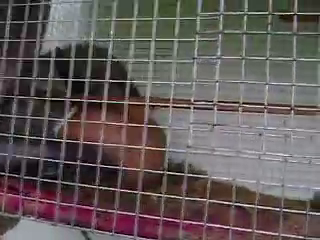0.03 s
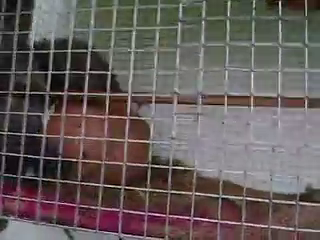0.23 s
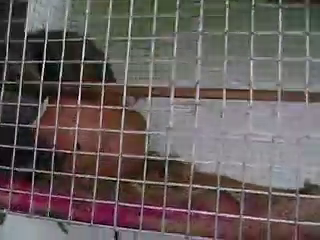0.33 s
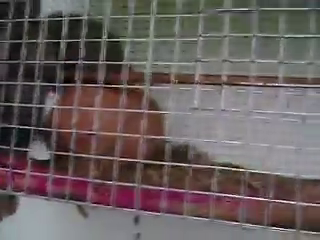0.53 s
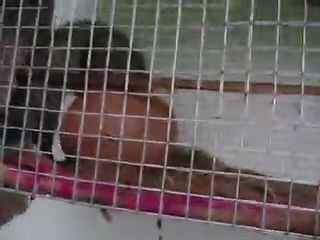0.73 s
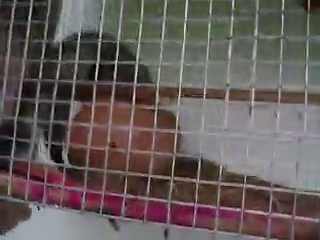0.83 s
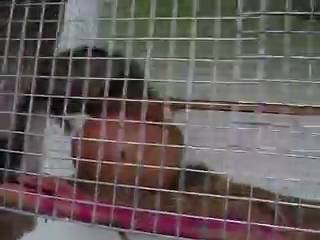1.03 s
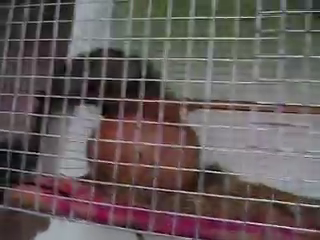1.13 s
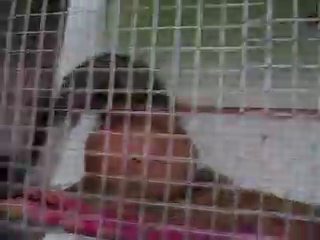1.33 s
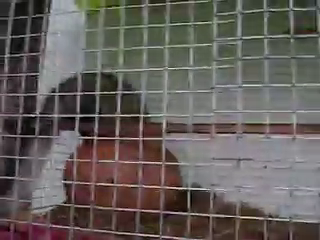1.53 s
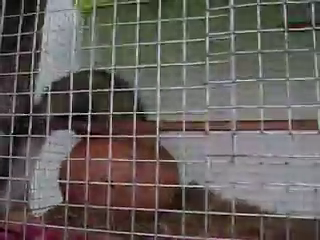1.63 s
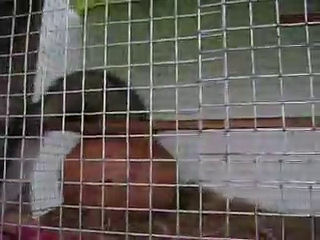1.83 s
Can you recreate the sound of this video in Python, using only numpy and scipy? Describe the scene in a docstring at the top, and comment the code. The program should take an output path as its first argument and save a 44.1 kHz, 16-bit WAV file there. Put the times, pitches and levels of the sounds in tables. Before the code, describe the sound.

A small caged animal squeaks hoarsely, close up. Low room noise, hiss and a thin wavering high tone open. At 0.26-0.44 s a loud raspy whistle rises briefly then falls steeply, with scuffling and soft thumps in bedding. Weaker falling chirps come at 0.7 and 1.06-1.2 s, with small ticks. A sharp wire snap at 1.48 s precedes two clearer squeaks until 1.63 s, then quiet noise.

```python
"""Hoarse, falling whistles of a small caged animal, close to the camera, over scuffling in its bedding.
The whistles are gliding sines broken into breathy pulses; grains, thumps and ticks make the bedding.
A wire snaps once as a burst of short modes. Thin tones waver in low room noise and treble hiss.
The camera is narrow in band, adds hiss that follows the level, and clips hard."""
import sys
import numpy as np
from scipy import signal
from scipy.fft import rfft, irfft, next_fast_len
from scipy.io import wavfile
from scipy.ndimage import uniform_filter1d, map_coordinates

SR = 44100
rng = np.random.default_rng(int(sys.argv[2]) if len(sys.argv) > 2 else 0)


def amp(db):
    return 10 ** (np.asarray(db, float) / 20)


def write(x):
    x = np.atleast_2d(x).T
    wavfile.write(sys.argv[1], SR, np.round(np.clip(x, -1, 1) * 32767).astype(np.int16))


N = 83790
T = np.arange(N) / SR

# Main whistles, one curve per call: t/s, pitch f/Hz, level/dB, hoarseness/0-1
OPENING_CALL = [(.261, 5000, -35.5, .7), (.265, 4880, -26, .7), (.268, 4220, -20.5, .8),
                (.271, 3920, -20, 0.77), (.285, 3860, -27, .9), (.298, 3770, -24.5, .9)]
LONG_CALL = [(.296, 2991, -30.5, .9), (.305, 3497, -21, .9), (.311, 3882, -18, 0.83), (.318, 3963, -21, .8),
             (.324, 4110, -16.5, .7), (0.337, 4090, -22, 0.92), (.35, 3900, -24, 0.68),
             (.359, 3577, -19, 0.64), (.372, 3330, -23.5, .9), (.39, 3017, -21.5, 0.91),
             (.397, 2580, -29, .7), (.405, 2284, -27.5, .6), (.415, 1986, -27.5, .6),
             (.421, 1977, -38.5, .7), (.428, 1990, -28, 0.61), (.438, 1920, -37.5, .7)]
SOFT_CALL = [(.658, 5460, -47, 0.73), (0.675, 5200, -42, .7), (.686, 4500, -45, .6),
             (.697, 3830, -31.5, .6), (.702, 3650, -36, 0.65), (.709, 3554, -27.5, 0.64),
             (.716, 3350, -28.5, 0.6), (.722, 3270, -42.5, 0.72)]
FAINT_CALL = [(1.064, 5020, -46, 0.62), (1.07, 4770, -37.5, .6), (1.08, 4275, -41, 0.62),
              (1.09, 3780, -41, 0.61), (1.098, 3420, -38, .8)]
PAIR_CALL = [(1.11, 5320, -43, 0.19), (1.122, 4950, -36.5, 0.25), (1.129, 4810, -25, 0.19),
             (1.139, 4624, -28.5, 0.42), (1.15, 4450, -28.5, 0.56), (1.157, 4400, -33, .6)]
PAIR_TAIL = [(1.156, 3945, -39, 0.837), (1.163, 3775, -25, 0.67), (1.168, 3667, -33, 0.69),
             (1.174, 3560, -23.5, 0.49), (1.18, 3415, -32.5, 0.86), (1.19, 3130, -33, 1),
             (1.197, 3080, -42, .8)]
FLAT_CALL = [(1.493, 4250, -45, .5), (1.5, 4064, -31, .5), (1.506, 3940, -22, .7), (1.511, 3893, -26, 0.64),
             (1.522, 3900, -29, .8), (1.535, 3870, -34.5, .8), (1.54, 3900, -44, .8)]
LAST_CALL = [(1.558, 5280, -39, .5), (1.564, 5135, -24.5, 0.54), (1.57, 4975, -28, .4),
             (1.577, 4834, -23, .2), (1.59, 4630, -22.5, .25), (1.601, 4450, -29, .5),
             (1.609, 4320, -33, .7), (1.622, 4250, -35.5, .8)]
# Short side notes beside the whistles: start t/s, length/s, first f/Hz, last f/Hz, level/dB
SIDE_NOTES = [(.272, .032, 4550, 4250, -28.5), (.274, 0.025, 5170, 4900, -32.5),
              (0.326, 0.018, 3400, 3200, -25.5), (.374, 0.015, 3880, 3600, -28),
              (0.333, 0.033, 4100, 4090, -33), (0.395, .035, 4400, 4200, -32),
              (0.404, .02, 3850, 3950, -30.5), (.426, .026, 3900, 3800, -23.5),
              (0.428, 0.018, 3550, 3520, -30.5), (.455, .018, 3700, 3520, -40),
              (0.698, 0.014, 4980, 4880, -46), (.704, 0.013, 950, 850, -38.5),
              (.788, 0.02, 1100, 1105, -35), (1.082, 0.022, 4350, 4230, -45),
              (1.12, 0.042, 2050, 2062, -41), (1.158, 0.017, 4700, 4540, -39),
              (1.506, .02, 4900, 4790, -42), (1.524, .022, 3700, 2720, -34),
              (1.553, 0.011, 2150, 1840, -29.5), (1.558, .016, 3950, 3250, -30.5),
              (1.56, .01, 5950, 5880, -35), (1.565, 0.072, 3050, 2950, -36.5),
              (1.584, .024, 3850, 3250, -28.5), (1.607, 0.0182, 3900, 3360, -32),
              (1.626, .02, 2650, 2290, -37), (1.628, 0.018, 5200, 5200, -38)]
# Colour of the breath noise under the voice: f/Hz, level/dB
RASP_COLOUR = [(900, -16.5), (2200, -5), (3500, 0), (5000, -3), (6500, -4.5), (8000, -61)]
# Loudness of the scuffling: t/s, level/dB
SCUFFLE_LEVEL = [(0.261, -50), (0.274, -34), (.3, -26), (.34, -26.5), (.37, -26.5), (.4, -29), (.44, -27.5),
                 (.455, -36.5), (.475, -52)]
# Colour of the scuffling: f/Hz, level/dB
SCUFFLE_TINT = [(40, -8.5), (300, -1.5), (1500, -2.5), (3000, -3.5), (6000, -8)]
# Soft thumps in the bedding: t/s, level/dB
BEDDING_THUMPS = [(.302, -26), (.3115, -19), (.3585, -18), (.334, -26), (.378, -26), (1.595, -30),
                  (1.772, -30)]
# Small ticks in the bedding: t/s, level at onset/dB
BEDDING_TICKS = [(.7244, -29), (0.7318, -27.5), (0.873, -34.5), (1.2096, -22.5)]
# Colour of the ticks: f/Hz, level/dB
TICK_TINT = [(500, -10.5), (1800, -2.5), (3800, 0), (5000, -7), (6500, -8.5)]
# Modes of the snapping wire: f/Hz, width/Hz, level relative to the snap/dB
WIRE_MODES = [(1117, 350, 2), (2276, 366, 4), (3250, 170, -6.5), (4457, 410, 3), (5026, 360, 4),
              (6000, 270, -10.5)]
# Two long wavering tones: t/s, f/Hz, level/dB
EARLY_TONE = [(0, 3110, -37.5), (.14, 3143, -47.5), (.225, 3116, -32), (.25, 3074, -36.5),
              (.3, 3054, -38.5), (.5, 3064, -37.5), (.65, 3083, -41), (.8, 3120, -41.5), (.9, 3114, -46),
              (1.09, 3130, -65)]
LATE_TONE = [(1.2, 3333, -52.5), (1.29, 3350, -43), (1.35, 3376, -45.5), (1.375, 3340, -50),
             (1.4, 3332, -49.5), (1.47, 3360, -51), (1.65, 3375, -47), (1.76, 3300, -59), (1.9, 3260, -59)]
# Faint steady-pitched tones: from t/s, to t/s, f/Hz, level/dB
FAINT_TONE_SPANS = [(0.013, 0.17, 2740, -47.5), (.03, 0.081, 2800, -44), (0.37, 0.74, 5000, -54),
                    (.93, 1.07, 450, -48.5), (.75, 1.08, 1300, -51.5)]
# Colour of the low room noise: f/Hz, density/dB per Hz
ROOM_COLOUR = [(20, -5.5), (60, -1), (300, -4.5), (800, -2.5), (1250, -5), (1700, -10), (2500, -12.5),
               (3300, -12.5), (4500, -19), (5500, -17), (6200, -32.5)]
# Low room noise before its fixed lift: t/s, level/dB
ROOM_CURVE = [(0.0, -35.5), (0.238, -38), (0.418, -40), (1.09, -39.5), (1.9, -39)]
# Colour of the treble hiss: f/Hz, level/dB
HISS_COLOUR = [(1400, -25.5), (1900, -2), (3300, -3), (4500, -1.5), (5800, -13.5), (6500, -13.5)]
# Loudness of the treble hiss: t/s, level/dB
HISS_LEVEL = [(0, -48), (.25, -41), (.5, -38.5), (.75, -42.5), (1, -54.5), (1.3, -45), (1.65, -51.5),
              (1.9, -76)]
# Colour of the hiss that follows the level in the camera: f/Hz, level/dB
GRIT_COLOUR = [(100, -14), (1000, -3), (3000, -0.5), (7000, 2.5)]
# Camera's response at its upper band edge: f/Hz, level/dB
BAND_EDGE = [(5300, 1.5), (5700, -4), (6000, -14), (6200, -30), (6500, -80), (7000, -120)]

NOTE_HOARSE, NOTE_EDGE_S, CALL_EDGE_S = .85, .004, .002
# pulse decay is an exponent per cycle, pulse rise a share of the cycle
PULSE_HZ, PULSE_JITTER, PULSE_SPREAD_DB, PULSE_DECAY, PULSE_RISE = 260, .3, 2.5, 1.5, .25
# narrow flutter and wide breath around the pitch; tremor of the pitch at full hoarseness
FLUTTER_HZ, FLUTTER_DB = 320, -3
BREATH_HZ, BREATH_DB = 1700, -4
TREMOR_HZ = 80
RASP_DB, RASP_S = -9.5, .002  # level under the voice; time over which it follows the voice
ECHO_T60, ECHO_DB = .12, -11  # s, dB
THUMP_S, TICK_T60 = .0008, .011  # s
SNAP_S, SNAP_DB, SNAP_RISE_S = 1.4843, -6.5, .00066
WAVER_HZ, WAVER_SHARE = 95, .65
GRIT_DB, GRIT_S = -13, .0015  # level under the sound; time over which it follows the sound
CLIP = .76  # share of full scale


def animal():
    """Whistles, their side notes and a wide breathy rasp that follows the voice."""
    calls = (OPENING_CALL, LONG_CALL, SOFT_CALL, FAINT_CALL, PAIR_CALL, PAIR_TAIL, FLAT_CALL, LAST_CALL)
    voice = sum(whistle(*np.transpose(call), CALL_EDGE_S) for call in calls)
    for start, length, first_hz, last_hz, db in SIDE_NOTES:
        times = [start, start + length]
        voice = voice + whistle(times, [first_hz, last_hz], [db] * 2, [NOTE_HOARSE] * 2, NOTE_EDGE_S)
    level = follow(voice, RASP_S)
    return voice + amp(RASP_DB) * level * unit(coloured(rng.standard_normal(N), RASP_COLOUR))


def whistle(s, hz, db, hoarse, edge_s):
    """When hoarse, the whistle breaks into uneven quick pulses with breath around the pitch."""
    share = np.clip(np.interp(T, s, hoarse), 0, 1)
    cycles = np.cumsum(PULSE_HZ * np.exp(PULSE_JITTER * wobble(150))) / SR
    sizes = amp(PULSE_SPREAD_DB * rng.standard_normal(N // 20))[cycles.astype(int)]
    part = cycles % 1  # position within the pulse
    pulses = unit(sizes * np.minimum(part / PULSE_RISE, 1) * np.exp(-PULSE_DECAY * part))
    flutter = amp(FLUTTER_DB) * murmur(FLUTTER_HZ)
    breath = amp(BREATH_DB) * murmur(BREATH_HZ)
    rough = pulses * unit(1 + flutter + breath)
    size = 1 - share + share * rough
    return tone(s, hz, db, size, edge_s, share * TREMOR_HZ * wobble(200))


def echo(x):
    """A short diffuse tail: the sound convolved with decaying noise."""
    tail = rng.standard_normal(SR // 4) * amp(-60 * T[:SR // 4] / ECHO_T60)
    return amp(ECHO_DB) * signal.fftconvolve(x, tail / np.linalg.norm(tail))[:N]


def bedding():
    """Scuffling of uneven noise grains, soft thumps as brief pressure swings, and decaying noise ticks."""
    s, db = np.transpose(SCUFFLE_LEVEL)
    grains = rng.standard_normal(N) * amp(2.2 * wobble(400))
    out = unit(coloured(grains, SCUFFLE_TINT)) * amp(np.interp(T, s, db, -120, -120))
    for s, db in BEDDING_THUMPS:
        u = np.clip(T - s, 0, None) / THUMP_S
        out = out + amp(db) * u * (2 - u) * np.exp(-u) * 2
    for s, db in BEDDING_TICKS:
        decay = amp(db - 60 * np.abs(T - s) / TICK_T60) * (T >= s)
        out = out + decay * unit(coloured(rng.standard_normal(N), TICK_TINT))
    return out


def snap():
    """The wire's modes swell for a moment and die at once; wider modes die sooner."""
    t = np.clip(T - SNAP_S, 0, None)
    rise = 1 - np.exp(-(t / SNAP_RISE_S) ** 2)
    modes = 0
    for hz, width_hz, db in WIRE_MODES:
        decay = np.exp(-(np.pi * width_hz * t / 2) ** 2)
        modes = modes + amp(db) * decay * np.sin(2 * np.pi * hz * t)
    return amp(SNAP_DB) * rise * modes


def tones():
    """Thin tones, each part steady and part randomly wavering in level and phase."""
    rows = [EARLY_TONE, LATE_TONE]
    rows += [[(start, hz, db), (end, hz, db)] for start, end, hz, db in FAINT_TONE_SPANS]
    out = 0
    for row in rows:
        size = np.sqrt(1 - WAVER_SHARE) + np.sqrt(WAVER_SHARE) * murmur(WAVER_HZ)
        out = out + tone(*np.transpose(row), size, .02)
    return out


def room_noise():
    """Low room noise and a treble hiss, each coloured noise with its own wandering level."""
    low_db = np.interp(T, *np.transpose(ROOM_CURVE)) + 1.0 + 1.1 * wobble(12.12)
    low = unit(coloured(rng.standard_normal(N), ROOM_COLOUR)) * amp(low_db)
    hiss_db = np.interp(T, *np.transpose(HISS_LEVEL)) + 2.1 * wobble(25)
    return low + unit(coloured(rng.standard_normal(N), HISS_COLOUR)) * amp(hiss_db)


def tone(s, hz, db, size, edge_s, tremor=0):
    """A sine along a pitch and level curve, its size shaped by a real or complex curve."""
    gate = np.clip(np.minimum(T - s[0], s[-1] - T) / edge_s, 0, 1)
    phase = 2 * np.pi * np.cumsum(np.interp(T, s, hz) + tremor) / SR
    return np.sqrt(2) * gate * amp(np.interp(T, s, db)) * np.real(size * np.exp(1j * phase))


def murmur(rate_hz):
    """Complex random curve of rms 1."""
    return (wobble(rate_hz) + 1j * wobble(rate_hz)) / np.sqrt(2)


def wobble(rate_hz):
    """A smooth random curve of rms 1, through rate_hz random points a second."""
    return unit(map_coordinates(rng.standard_normal(N // 8), [T * rate_hz]))


def unit(x):
    """Scaled to rms 1."""
    return x / np.sqrt(np.mean(np.abs(x) ** 2) + 1e-20)


def follow(x, span_s):
    """Running rms level over span_s seconds."""
    return np.sqrt(np.abs(uniform_filter1d(x ** 2, int(span_s * SR))))


def coloured(x, points):
    """x through a response of f/Hz, level/dB points, joined along log frequency."""
    m = next_fast_len(N + 8192)
    f, db = np.transpose(points)
    hz = np.fft.rfftfreq(m, 1 / SR)
    response = amp(np.interp(np.log(hz + 1), np.log(f + 1), db))
    return irfft(rfft(x, m) * response, m)[:N]


def scene():
    """Everything at the microphone; only the voice carries the echo."""
    voice = animal()
    return (voice + echo(voice) + bedding() + snap() + tones() + room_noise())[None]


def band_limit(x):
    """A steep low-pass at the top of the band."""
    return signal.sosfilt(signal.butter(12, 15500, fs=SR, output="sos"), x)


def record(dry):
    """In the camera, coarse sampling adds hiss that follows the level; then the band edge and a hard clip."""
    grit = coloured(rng.standard_normal(N), GRIT_COLOUR)
    hissy = dry[0] + amp(GRIT_DB) * follow(dry[0], GRIT_S) * grit
    narrow = coloured(hissy, BAND_EDGE)
    mix = np.clip(narrow, -CLIP, CLIP)[None]
    return band_limit(mix)


dry = scene()
out = record(dry)
write(out)
```